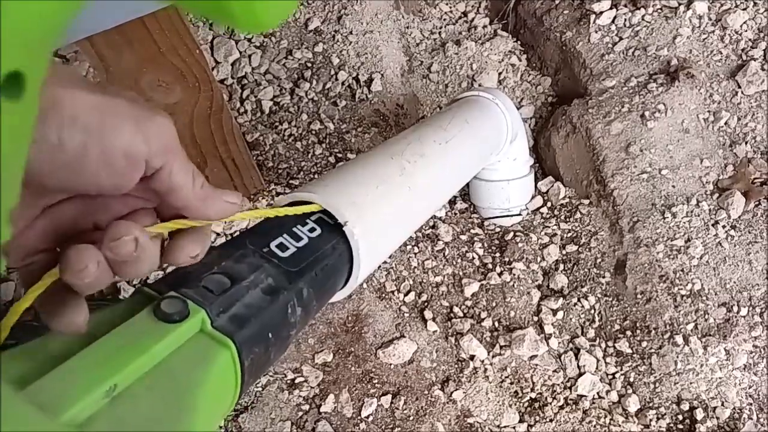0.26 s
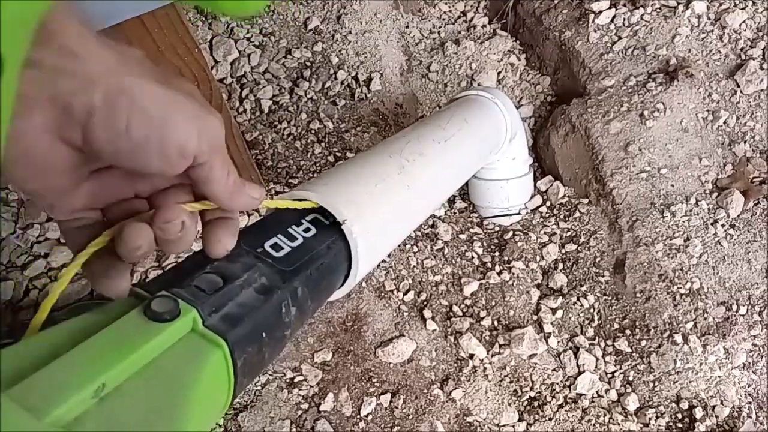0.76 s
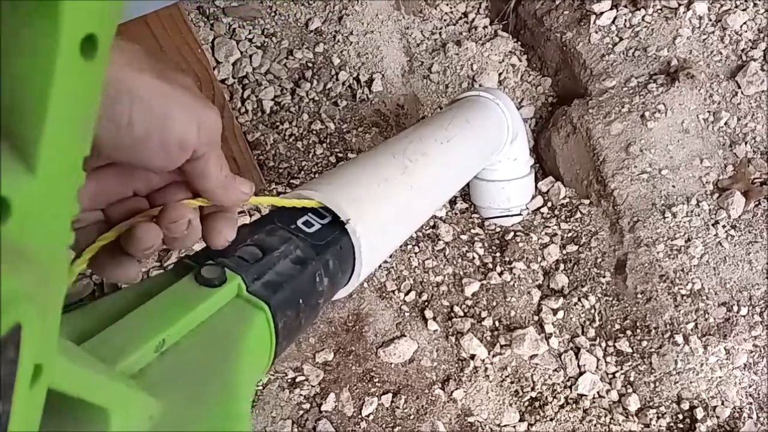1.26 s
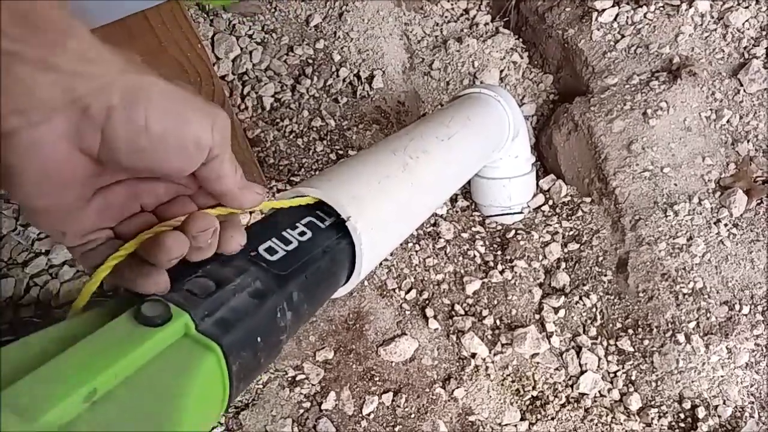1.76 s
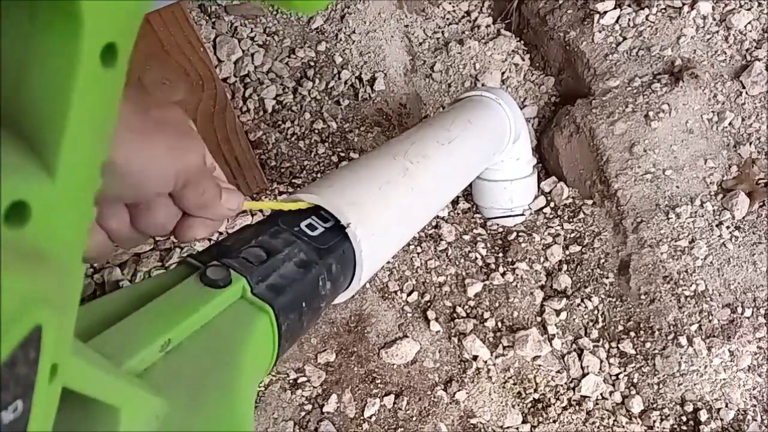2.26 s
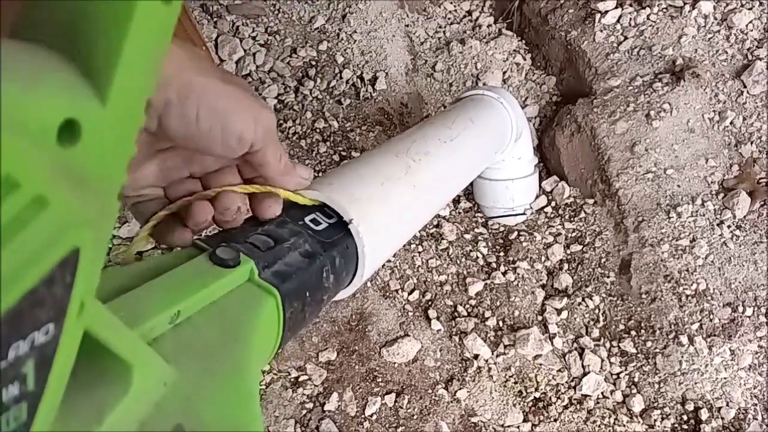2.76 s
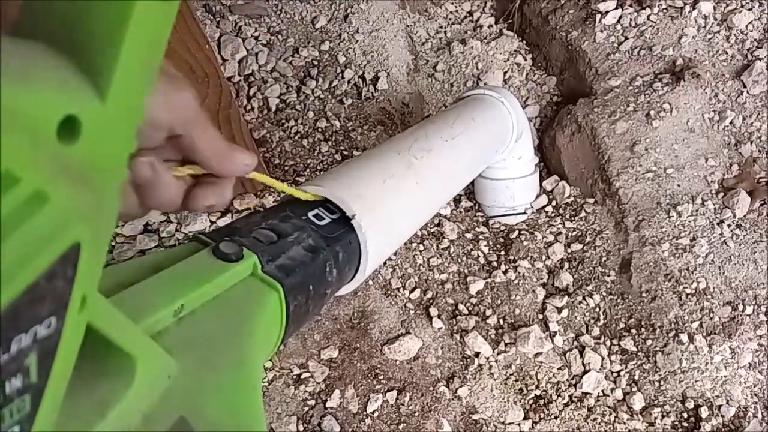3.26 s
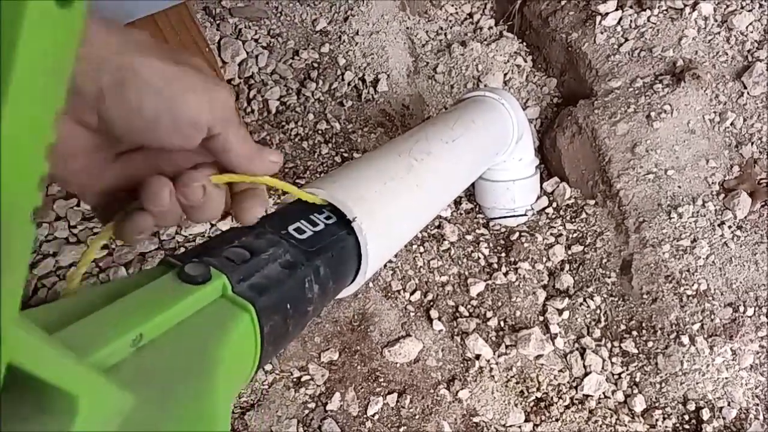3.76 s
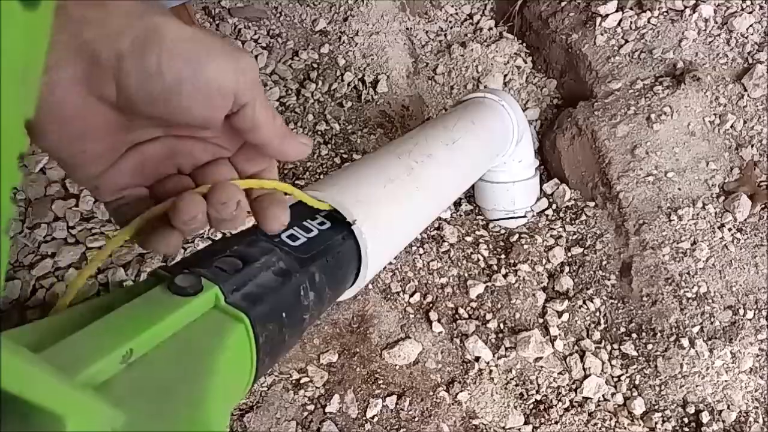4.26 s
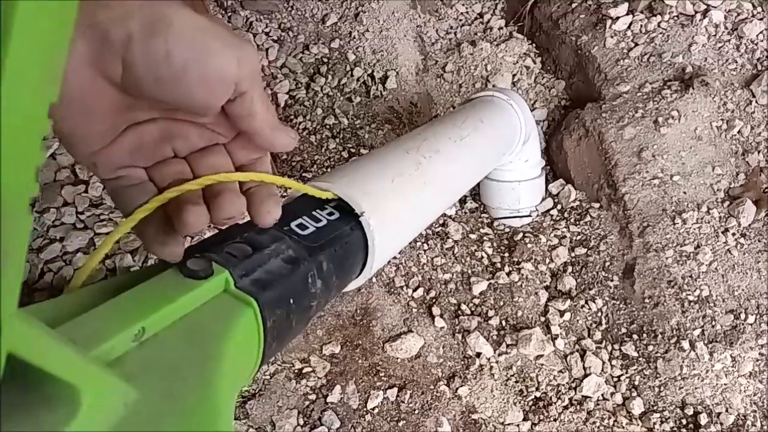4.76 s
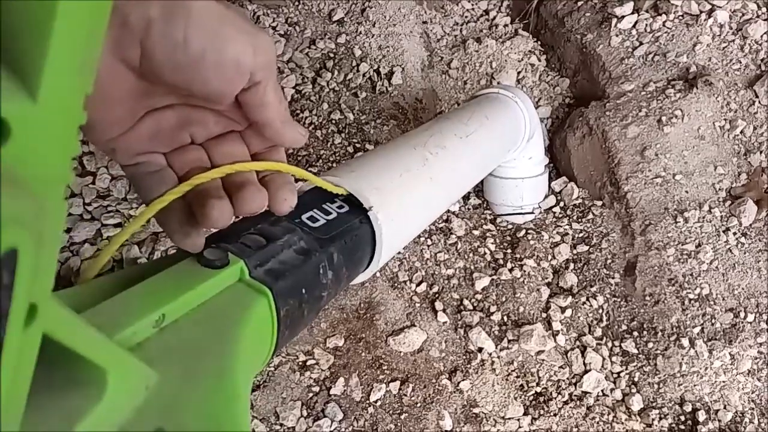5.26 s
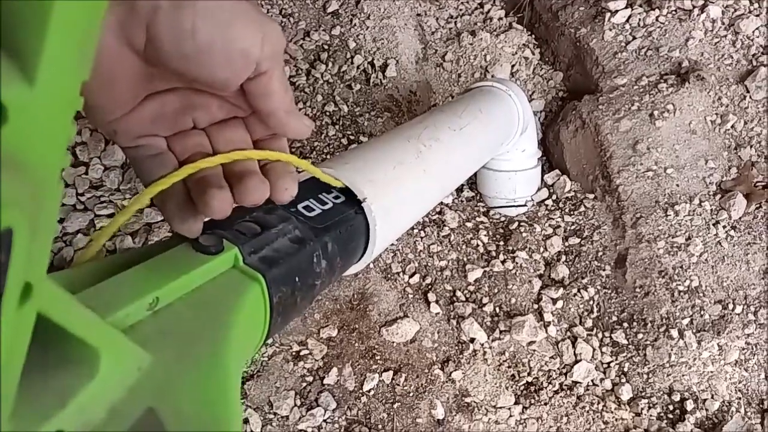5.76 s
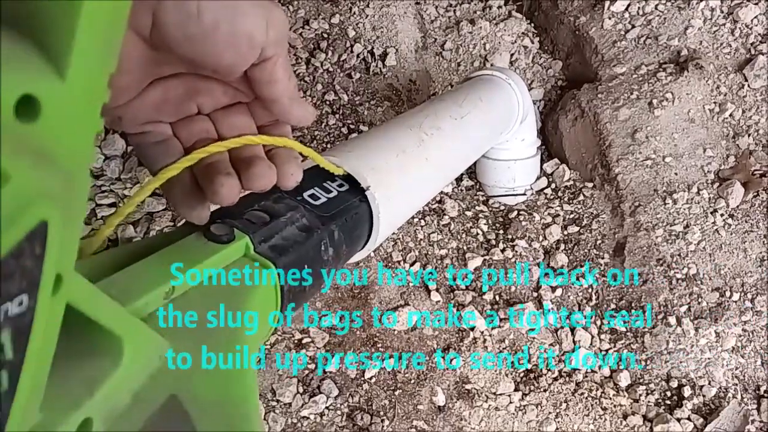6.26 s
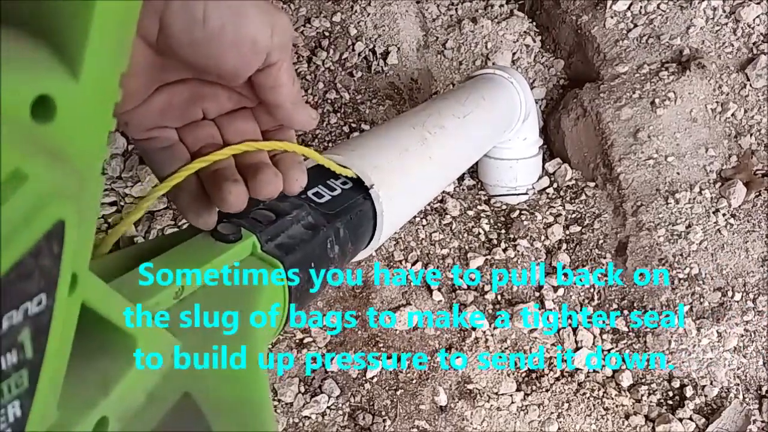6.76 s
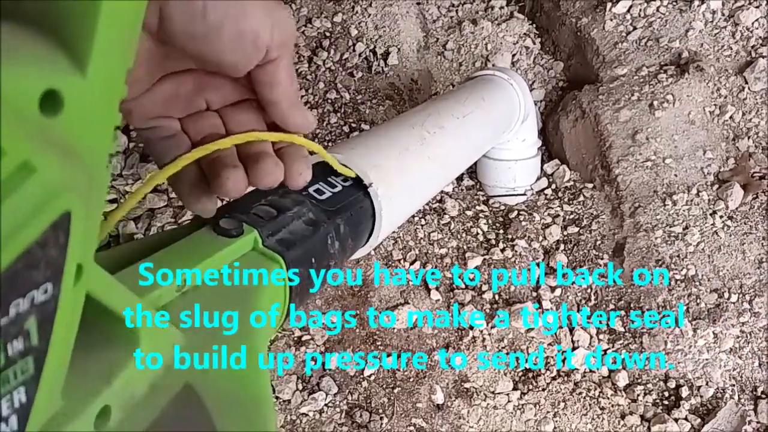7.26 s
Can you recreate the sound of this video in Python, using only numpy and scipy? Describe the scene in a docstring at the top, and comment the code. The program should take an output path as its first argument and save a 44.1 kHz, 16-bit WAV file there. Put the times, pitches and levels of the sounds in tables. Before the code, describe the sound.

An electric leaf blower runs at full, steady power very close to the microphone, its nozzle pushed into a plastic pipe outdoors. Dense bright rushing air carries a motor whine and faint low hum. The sound barely changes in loudness; a clear blade tone emerges around 2.3 seconds, drops away near 3.6 as the gap opens, then returns unevenly toward the end.

```python
"""An electric leaf blower, its nozzle pushed into a plastic pipe close to the left of two microphone ports.
Starts with the gap at the nozzle open; it shuts near 1.2 s, opens by 1.5 s and shuts again near 2.1 s.
The blade tone stands out left from 2.3 s; it and the shaft speed drop near 3.6 s as the gap opens again.
From 5 s the blade tone comes and goes, strong at the end. Throughout: shaped noise is the air rush, short
wavering sines are its brief narrow swells, steadier wavering sines are rotor tones and mains buzz."""
import sys
import numpy as np
from scipy import signal
from scipy.io import wavfile
from scipy.ndimage import uniform_filter1d

SR = 44100
rng = np.random.default_rng(int(sys.argv[2]) if len(sys.argv) > 2 else 0)


def store_wav(level_fs):
    """Save 16-bit WAV to argv[1]."""
    pcm = np.round(np.clip(np.atleast_2d(level_fs), -1, 1) * 32767)
    wavfile.write(sys.argv[1], SR, pcm.T.astype(np.int16))


N = 331089

# Shaft speed: time_s, shaft_hz
SHAFT_HZ = [(0, 241), (.95, 240.8), (1.2, 241.2), (1.42, 241.9), (1.56, 241.1), (1.8, 239.4), (2.0, 240.2),
            (2.37, 242.3), (2.6, 242.55), (3.48, 242.6), (3.8, 240.4), (4.35, 240.1), (4.8, 240.5),
            (5.45, 241.35), (5.75, 241.2), (6.25, 240.75), (7.5, 242)]
# Gap between nozzle and pipe: time_s, open_share (0-1)
GAP_OPEN = [(0, 0.7), (1.03, 0.46), (1.15, 0), (1.36, 0), (1.45, 0.57), (1.95, 0.5), (2.1, 0.02),
            (3.52, 0.3), (3.6, 0.42), (3.72, 0.3), (3.85, 0.39), (7.5, 0.22)]
# Torque pulsation, odd multiples: pitch_hz, left_db, right_db
MAINS_TONES = [(120, -76, -86), (360, -72, -83), (601, -71, -79)]
# Stronger shaft multiples: multiple, left_db, right_db
STRONG_ORDERS = [(2.0, -65.5, -77.5), (3.0, -66, -77), (12.0, -65.0, -68.5), (18.0, -65, -81.7),
                 (27.0, -56.0, -83.4), (29.0, -54.7, -86.3), (30.0, -55.3, -85.3), (32.0, -58.0, -78.8),
                 (35.0, -65.3, -82.2), (36.0, -67.2, -79.3), (37.0, -68.7, -87.6), (39.0, -73.9, -93.9),
                 (41.0, -74.6, -86.1), (42.0, -74.8, -90.4), (43.0, -80.7, -93.1), (47.0, -88.2, -96.1),
                 (49.0, -85.6, -99.9), (50.0, -87.7, -99.7), (59.0, -92.3, -101.3), (10, -66, -78),
                 (13, -66, -86), (28, -61, -90), (31, -58, -82), (34, -66, -84)]
# Blade tone at the left port, before its swells: time_s, level_db
BLADE_LEFT_DB = [(0, -55), (.35, -53), (.55, -52), (.7, -57), (1.0, -60), (1.2, -56), (1.5, -51),
                 (1.65, -58), (2.1, -65), (2.3, -52), (2.45, -47), (2.65, -47), (2.8, -42.5), (3.53, -42),
                 (3.67, -60), (4.0, -60), (4.6, -66), (5.0, -53.5), (5.5, -52.5), (5.75, -58), (6.3, -59),
                 (6.9, -51), (7.5, -46.5)]
# Blade tone at the right port: time_s, level_db
BLADE_RIGHT_DB = [(0, -51), (.65, -55), (.8, -52), (1.6, -56), (1.82, -57), (2.0, -53), (2.35, -55),
                  (2.52, -48), (2.75, -55), (2.95, -49.5), (3.3, -54), (3.45, -46), (3.65, -67), (4.9, -61),
                  (7.5, -63)]
# Whines, by name: left_gap_shut_db, added_gap_open_db, right_minus_left_db
WHINE_LEVELS = {"low": (-66, 10, -14), "middle": (-85, 6, -11), "high": (-79, -2, -6)}
# Whines, by name: multiple of the shaft speed
WHINE_ORDERS = {"low": 23, "middle": 44, "high": 48}
# Brief swells and dips of the hum, blade tone and whines: centre_s, bell_width_s, tone_name, change_db
TONE_SWELLS = [(0.38, 0.018, "hum", 14), (.1, 0.11, "hum", -10), (0.49, 0.021, "hum", 5),
               (0.73, 0.05, "hum", 8), (0.885, 0.026, "hum", 12), (1.077, 0.018, "hum", 9),
               (1.57, 0.14, "hum", 6), (1.8, 0.031, "hum", 10), (2.505, 0.025, "hum", 13),
               (.96, .015, "hum", -10), (3, .04, "hum", -10), (5.08, 0.046, "hum", -8),
               (9.5, 0.023, "hum", -10), (5.23, 0.022, "hum", 12), (3.97, 0.15, "hum", 12),
               (5.428, 0.077, "hum", 14), (6.124, 0.073, "hum", 10.5), (6.78, 0.06, "hum", 5),
               (7.167, 0.03, "hum", 12), (6.7, 0.051, "hum", 7), (.82, 0.035, "blade", 15),
               (3.92, .06, "blade", 5), (1.4, 0.025, "blade", 6), (2.94, .015, "blade", -6),
               (6.97, .025, "blade", -6), (5.585, 0.03, "blade", 7), (7.05, 0.03, "blade", 5.5),
               (.78, 0.046, "low", 10), (1.02, 0.035, "low", 16), (1.44, .04, "low", 15),
               (1.58, .03, "low", 8), (1.72, .02, "low", 13), (1.94, .025, "low", 14),
               (2.658, .03, "low", 17), (3.594, 0.037, "low", 17), (3.694, 0.035, "low", 14),
               (.46, 0.065, "middle", 22), (.76, .06, "middle", 14), (.96, .1, "middle", 17),
               (1.5, 0.049, "middle", 26), (2.283, .06, "middle", 24), (3.514, .05, "middle", 19),
               (.5, .4, "high", -12), (1.61, 0.05, "high", 15), (1.76, .05, "high", 17),
               (1.92, .05, "high", -10), (1.18, 0.073, "high", 8), (2.9, .3, "high", 0),
               (3.92, .08, "high", 6), (6.85, .15, "high", 6)]
# Brief narrow swells of the air rush, drawn as wavering sines: centre_s, bell_width_s, pitch_hz, left_db
NARROW_SWELLS = [(1.61, 0.027, 1274, -49), (1.79, 0.028, 1270, -51), (3.56, 0.033, 1328, -49.5),
                 (3.65, 0.023, 1284, -46), (4.42, 0.02, 1304, -51), (4.50, 0.028, 1310, -51),
                 (4.59, 0.026, 1297, -49.5), (4.96, .03, 1330, -52), (5.17, .03, 1356, -52),
                 (5.77, 0.026, 1336, -53), (5.89, 0.016, 1320, -47.5), (6.12, 0.041, 1317, -47.5),
                 (6.29, 0.021, 1345, -49), (6.60, 0.031, 1333, -51.5), (6.85, 0.02, 1390, -55),
                 (1.84, .025, 1610, -49.5), (3.85, 0.022, 1610, -47), (4.08, 0.036, 1624, -50),
                 (4.21, 0.036, 1604, -50), (4.75, .035, 1605, -50), (5.59, .04, 1606, -54),
                 (.85, .03, 2670, -49), (2.2, .04, 2660, -52), (3.19, .025, 2670, -49),
                 (3.73, 0.015, 2670, -43), (3.95, 0.034, 2640, -49), (4.20, 0.019, 2610, -50),
                 (4.66, 0.023, 2660, -47), (4.90, .025, 2668, -53), (5.38, 0.027, 2710, -49),
                 (5.64, .025, 2630, -53), (5.79, .025, 2640, -49), (.32, .02, 3060, -48),
                 (.66, 0.02, 3081, -49), (.93, 0.036, 3105, -49.5), (1.28, .035, 3210, -50.5),
                 (1.74, 0.027, 3130, -52), (2.48, 0.025, 3230, -46), (2.73, 0.016, 3140, -43),
                 (2.81, 0.019, 3190, -46), (3.00, 0.029, 3195, -46.5), (3.17, .03, 3100, -50),
                 (3.34, 0.031, 3080, -47), (3.57, .035, 3120, -50), (.73, .04, 4370, -49),
                 (1.02, .02, 4450, -48), (2.87, 0.017, 4410, -44), (3.14, 0.043, 4350, -42),
                 (2.55, .035, 4440, -50), (3.4, .05, 4500, -49), (3.97, .018, 4400, -44),
                 (4.12, .035, 4370, -49), (4.90, .04, 4365, -47.5), (5.21, .025, 4394, -50),
                 (5.44, .025, 4420, -49), (5.68, .018, 4450, -52), (5.97, 0.029, 4409, -47),
                 (6.30, .035, 4380, -46), (6.56, 0.025, 4414, -44), (7.29, .02, 4280, -52),
                 (7.38, .03, 4380, -51), (.10, .025, 5050, -52), (.43, .02, 5090, -49),
                 (.51, .035, 5050, -51), (.89, .03, 5300, -49), (1.75, 0.064, 5030, -49),
                 (.10, .025, 5430, -54), (.31, .02, 5400, -46), (.78, .025, 5400, -47)]
# Balance of the narrow swells: pitch_hz, right_minus_left_db
NARROW_SWELL_BALANCE = [(1320, -11), (1600, -7), (2650, -4), (3150, -14), (4400, -20), (5200, -11)]
# Rush without resonances, left port: pitch_hz, level_db_per_hz
RUSH_LEFT_DB = [(30.0, -106), (60.0, -101), (110.0, -82), (380.0, -84.5), (900.0, -79.5), (2050.0, -83.5),
                (2500.0, -76.5), (4200.0, -83), (4800.0, -83), (5950.0, -80), (8300.0, -75.5),
                (9300.0, -87.5), (11000.0, -102.5), (15600.0, -112.5)]
# Rush without resonances, right port: pitch_hz, level_db_per_hz
RUSH_RIGHT_DB = [(30.0, -119), (60.0, -107), (110.0, -93), (380.0, -95), (900.0, -88.7), (1450.0, -85.3),
                 (2100.0, -83.9), (3000.0, -87.4), (3420.0, -99.6), (5500.0, -94.1), (6900.0, -97.8),
                 (8600.0, -91.2), (10500.0, -107.5), (15600.0, -113.5)]
# Peaks and dips from housing, gap and pipe: centre_hz, width_hz, left_db, right_db, flutter_db, wander_hz,
# right_share (0-1, of swell and flutter)
RESONANCE_BANDS = [(7250, 560, 9.5, 1.1, .3, 90, .2), (8200, 700, -2, .3, .4, 60, .95),
                   (1320, 55, 7.5, .8, 2.5, 25, .6), (1598, 12, 3, 1.8, 2.5, 4, .3),
                   (3160, 80, 3, 2.4, 2, 50, .3), (4395, 60, 6, 1.5, 2.0, 30, .3),
                   (5200, 300, 1.5, 3.3, 1.5, 100, .3), (130, 60, -.8, -2.4, 3, 25, .95),
                   (241, 18, 6, 6.7, 2, 3, .95), (1025, 40, 4.5, 1, 2.5, 15, .5),
                   (3650, 100, 4.5, 1.5, 2.5, 40, .3), (6450, 150, 2.3, 1.1, 1, 50, .2),
                   (2600, 170, -2.2, 5.2, 1.5, 80, .8), (570, 45, 3.1, 3.7, 3.5, 25, .9),
                   (880, 50, -.2, 5.5, 2.5, 30, .9), (1750, 70, 1.5, -2.7, 2, 30, .4),
                   (2080, 60, -3.5, -2.5, .5, 10, .5), (1450, 70, -.6, 3.1, 1.5, 20, .8),
                   (1900, 60, .3, 1.6, 1.5, 20, .8), (5700, 120, -1.3, 2.5, 1.5, 40, .8),
                   (4230, 70, -3, -2, .5, 20, .5), (8130, 160, -2.5, 0, .5, 40, .2),
                   (8950, 150, 2.5, 0, .5, 40, .2), (985, 20, 0, -5, .5, 5, .5), (66, 16, 3, 3, 4, 8, .9),
                   (360, 40, -2.5, -1.5, .5, 5, .9), (810, 70, -3, .5, 1, 15, .3),
                   (1200, 90, 1.5, 0, 1, 20, .3), (1400, 50, 2, 0, 1, 15, .3),
                   (1590, 60, -2, -1, .5, 10, .3), (680, 25, -1, -5, .5, 5, .5),
                   (3470, 60, -2.5, 0, .5, 20, .3), (12200, 900, 2, 0, .5, 100, .3)]
# Response of the first eight resonances: start_db, slope_db_per_s, speed_db_per_hz, gap_open_db
RESONANCE_RESPONSE = [(2, -0.43, 0, 0.2), (-1, -0.1, -0.2, 1.2), (-4.5, 0.58, -0.1, 1), (0, 0.83, 0, 8),
                      (-1.5, 0.51, 3.5, -6), (-2.5, 0.96, -0.5, 1.5), (-3, -0.35, 0.7, 13),
                      (-4.5, 0.44, -0.5, 5.5)]
# Brief swells and dips of the rush, mostly narrow: centre_s, bell_width_s, centre_hz, width_hz, change_db
RUSH_SWELLS = [(1.66, 0.12, 1740, 35, 11), (1.65, 0.13, 10700, 500, 4), (3.62, .08, 10700, 500, 4),
               (1.75, 0.074, 9700, 70, 6), (.55, .45, 10550, 300, 4), (2.0, .35, 10550, 300, 4),
               (4.4, .6, 10550, 300, 3.5), (1.65, .15, 50, 25, 8), (.35, .4, 2650, 150, -2),
               (4.6, 1.1, 2650, 150, 1.5), (2.08, .03, 620, 40, 9), (5.33, .025, 650, 40, 9),
               (5.1, 0.045, 660, 45, 14), (7.2, .04, 640, 25, 10), (1.66, 0.081, 140, 97, 8),
               (.93, .06, 3130, 46, 12), (0.099, .12, 3130, 65, 11.5), (5.06, 0.13, 3000, 55, 6),
               (2.88, 0.08, 625, 22, 14.5), (4.03, 0.17, 1598, 14, 7), (2.95, .3, 3170, 130, 2.5),
               (1.8, .1, 5030, 80, 5), (1.74, 0.27, 1300, 40, -3)]
# Similarity of the rush at the ports: pitch_hz, likeness (0-1)
PORT_LIKENESS = [(30, 0.37), (250, 0.99), (700, 0.72), (1100, 0.83), (1500, 0.38), (2050, 0.26),
                 (2650, 0.7), (3200, 0.21), (6200, 0.52), (7000, 0.033), (15000, 0.025)]
# Phase lead of the right port: pitch_hz, lead_rad
PORT_LEAD = [(30, .1), (250, .95), (750, 3.1), (1100, 4.3), (1400, 7.1), (1900, 9.0), (2200, 12.4),
             (2900, 12.3), (4300, 15.6), (5000, 16.4), (6000, 16.8), (7000, 22.1), (10300, 28.0),
             (15000, 38.0)]

USUAL_SHAFT_HZ, BLADES = 241, 9
HUM_LEFT_DB, HUM_RIGHT_MINUS_LEFT_DB = -59, -9.5
COMB_OVER_RUSH_DB = -9  # weak tone level relative to the rush per Hz at its pitch
FRAME, HOP, HOLD = 2048, 512, 100  # samples
KNEE_DB, EDGE_HZ = -23.7, 15720


def gain_of(db):
    """Decibels to amplitude factor."""
    return 10 ** (np.asarray(db) / 20)


def evened(x):
    """Scales each row to rms 1."""
    return x / np.sqrt(np.mean(abs(x) ** 2, axis=-1, keepdims=True) + 1e-20)


def curve(points, time_s):
    """Interpolates a control curve linearly in time."""
    return np.interp(time_s, *np.transpose(points))


def read(points, hz):
    """Interpolates a spectrum table on a log-frequency axis."""
    table_hz, value = np.transpose(points)
    return np.interp(np.log(hz + 1), np.log(table_hz + 1), value)


def bump(x, centre, width):
    """Gaussian bell of height 1."""
    return np.exp(-.5 * ((x - centre) / width) ** 2)


def drift(rate_hz, count):
    """Rows of slow complex noise, rms 1, each value held for HOLD samples."""
    steps = N // HOLD + 2
    noise = rng.standard_normal((count, steps)) + 1j * rng.standard_normal((count, steps))
    slow = np.fft.ifft(noise * bump(np.fft.fftfreq(steps, HOLD / SR), 0, rate_hz))
    return np.repeat(evened(slow), HOLD, axis=1)[:, :N]


def tone(turns, hz, db, steady, wobble):
    """Sine at both ports: a steady part plus one wavering in level and phase; hz sets the port lead."""
    envelope = steady + np.sqrt(1 - steady ** 2) * wobble
    left = envelope * np.exp(2j * np.pi * (turns + rng.random()))
    right = left * np.exp(1j * read(PORT_LEAD, hz))
    return np.sqrt(2) * gain_of(db) * np.array([left.real, right.real])


def tone_swell_db(name, time_s):
    """Sums the bell-shaped level changes of one tone."""
    return sum(db * bump(time_s, centre_s, width_s)
               for centre_s, width_s, which, db in TONE_SWELLS if which == name)


def rush_level_db(hz, swell_db, flutter, wander):
    """Rush level per Hz, ports x bins x times; eddies shake each resonance in level and pitch."""
    level_db = np.array([read(RUSH_LEFT_DB, hz), read(RUSH_RIGHT_DB, hz)])[:, :, None]
    for k, band in enumerate(RESONANCE_BANDS):
        centre_hz, width_hz, left_db, right_db, flutter_db, wander_hz, right_share = band
        moved_db = flutter_db * flutter[k]
        if k < len(swell_db):
            moved_db = moved_db + swell_db[k]
        shape = bump(hz[:, None], centre_hz + wander_hz * wander[k], width_hz)
        port_db = np.reshape([left_db, right_db], (2, 1, 1))
        port_share = np.reshape([1, right_share], (2, 1, 1))
        level_db = level_db + shape * (port_db + moved_db * port_share)
    return level_db


def mains():
    """Motor torque pulsation: fixed-pitch sines with slow wavering."""
    time_s = np.arange(N) / SR
    wobbles = drift(1.1, count=len(MAINS_TONES))
    out = np.zeros((2, N))
    for (hz, *port_db), wobble in zip(MAINS_TONES, wobbles):
        out += tone(hz * time_s, hz, np.reshape(port_db, (2, 1)), .83, wobble)
    return out


def narrow_swells():
    """Brief narrow swells of the air rush, drawn as short wavering sines under a bell."""
    out = np.zeros((2, N))
    wobble = drift(40.0, count=1)[0]
    for k, (centre_s, width_s, hz, left_db) in enumerate(NARROW_SWELLS):
        first = max(round((centre_s - 3 * width_s) * SR), 0)
        last = min(round((centre_s + 3 * width_s) * SR), N)
        at = np.arange(first, last)
        port_db = [[left_db], [left_db + read(NARROW_SWELL_BALANCE, hz)]]
        # a further second of offset per swell varies the wavering
        wave = tone(hz * at / SR, hz, port_db, .7, wobble[(at + k * SR) % N])
        out[:, at] += bump(at / SR, centre_s, width_s) * wave
    return out


def rotor():
    """Shaft-locked sines: unbalance hum, blade tone, whines and a comb of other multiples."""
    time_s = np.arange(N) / SR
    shaft_hz, gap = curve(SHAFT_HZ, time_s), curve(GAP_OPEN, time_s)
    turns, mean_hz = np.cumsum(shaft_hz) / SR, shaft_hz.mean()
    wobble = drift(4.7, count=62)

    hum_db = HUM_LEFT_DB + tone_swell_db("hum", time_s)
    hum_ports_db = [hum_db, hum_db + HUM_RIGHT_MINUS_LEFT_DB]
    out = tone(turns, mean_hz, hum_ports_db, .8, drift(15.0, count=1)[0])

    blade_ports_db = [curve(BLADE_LEFT_DB, time_s) + tone_swell_db("blade", time_s),
                      curve(BLADE_RIGHT_DB, time_s)]
    out += tone(BLADES * turns, BLADES * mean_hz, blade_ports_db, .98, drift(16.0, count=1)[0])

    whine_db = {}
    for name, (shut_db, open_db, right_db) in WHINE_LEVELS.items():
        left_db = shut_db + open_db * gap + tone_swell_db(name, time_s)
        whine_db[WHINE_ORDERS[name]] = np.array([left_db, left_db + right_db])

    strong_db = {round(order): np.reshape(port_db, (2, 1)) for order, *port_db in STRONG_ORDERS}
    calm = np.zeros((len(RESONANCE_BANDS), 1))
    order_hz = np.arange(len(wobble)) * mean_hz
    weak_db = rush_level_db(order_hz, calm, calm, calm) + COMB_OVER_RUSH_DB
    flicker = drift(18.0, count=3)
    for k in range(2, len(wobble)):
        if k in whine_db:
            out += tone(k * turns, k * mean_hz, whine_db[k], .75, flicker[k % 3])
        elif k != BLADES:
            out += tone(k * turns, k * mean_hz, strong_db.get(k, weak_db[:, k]), .77, wobble[k])
    return out


def rush():
    """Turbulent air: random short-time spectra in drifting patches, partly shared by the ports."""
    frames, hz = N // HOP + 5, np.fft.rfftfreq(FRAME, 1 / SR)
    at = np.minimum(np.arange(frames) * HOP, N - 1)
    time_s = at / SR

    extra_hz = curve(SHAFT_HZ, time_s) - USUAL_SHAFT_HZ
    controls = np.array([np.ones(frames), time_s, extra_hz, curve(GAP_OPEN, time_s)])
    response_db = np.array(RESONANCE_RESPONSE) @ controls
    # real and imaginary parts each have rms near 1
    eddies = np.sqrt(2) * drift(14.0, count=len(RESONANCE_BANDS) + 1)[:, at]
    level_db = rush_level_db(hz, response_db, eddies.real, eddies.imag)
    for centre_s, width_s, centre_hz, width_hz, db in RUSH_SWELLS:
        level_db = level_db + db * bump(hz, centre_hz, width_hz)[:, None] * bump(time_s, centre_s, width_s)

    a, b, c, d, patches = rng.standard_normal((frames, len(hz), 5)).T
    patches = uniform_filter1d(patches, size=4, axis=0)  # over bins
    patches = uniform_filter1d(patches, size=8, axis=1)  # over frames
    level_db = level_db + 2.2 * patches / patches.std() + .2 * eddies[-1].real

    likeness = read(PORT_LIKENESS, hz)[:, None]
    lead = np.exp(1j * read(PORT_LEAD, hz))[:, None]
    left = a + 1j * b
    right = likeness * left * lead + np.sqrt(1 - likeness ** 2) * (c + 1j * d)
    spectra = np.array([left, right]) * gain_of(level_db)
    scale = np.sqrt(SR / FRAME * 1.5)  # spectral density and window overlap
    return scale * signal.istft(spectra, nperseg=FRAME, noverlap=FRAME - HOP)[1][:, :N]


def scene():
    """Mains buzz, rotor tones, and the air rush with its narrow swells."""
    return mains() + narrow_swells() + rotor() + rush()


def record(dry):
    """Microphone amplifier rounds the peaks (tanh); a low-pass then limits the band."""
    knee = gain_of(KNEE_DB)
    rounded = knee * np.tanh(dry / knee)
    low_pass = signal.firwin(2047, EDGE_HZ, window=("kaiser", 9), fs=SR)
    return signal.oaconvolve(rounded, low_pass[None], "same")


dry = scene()
out = record(dry)
store_wav(out)
```